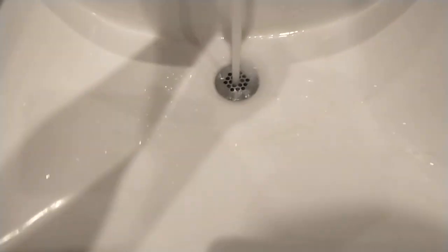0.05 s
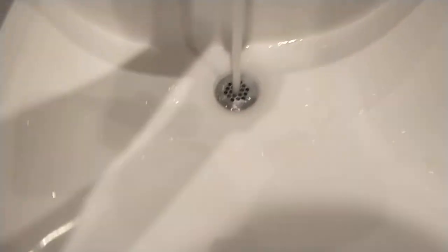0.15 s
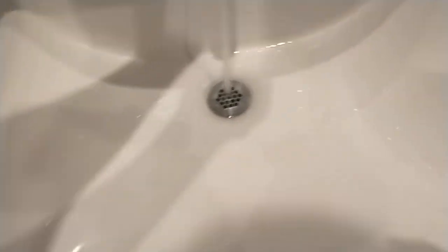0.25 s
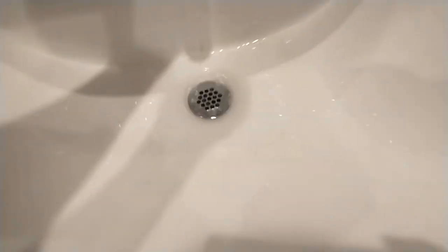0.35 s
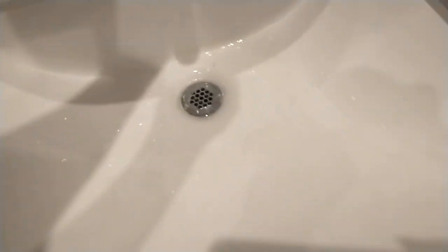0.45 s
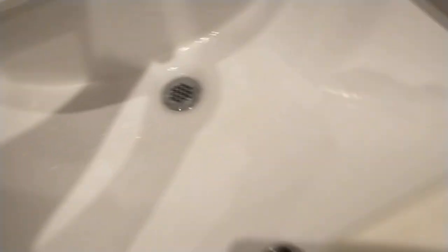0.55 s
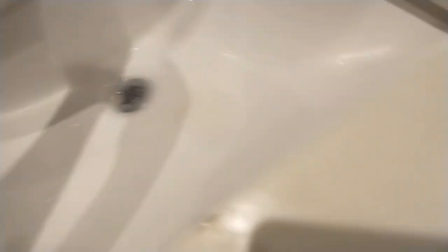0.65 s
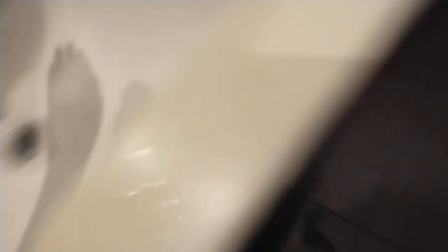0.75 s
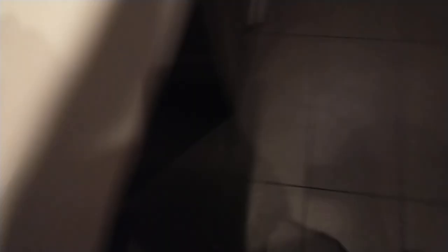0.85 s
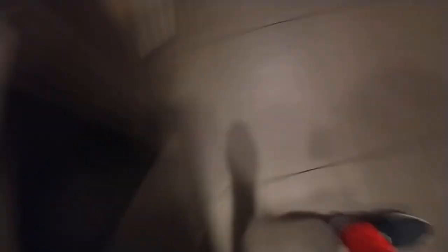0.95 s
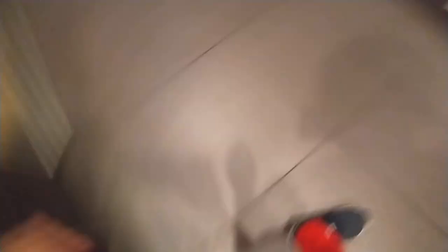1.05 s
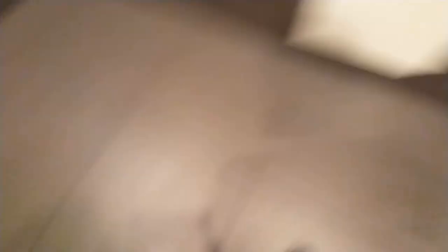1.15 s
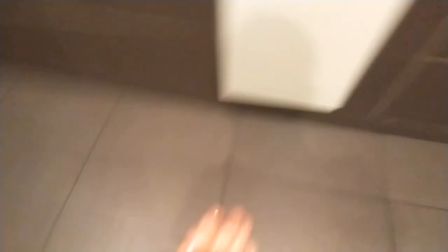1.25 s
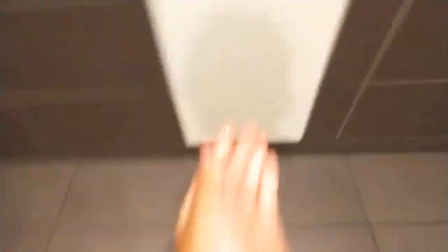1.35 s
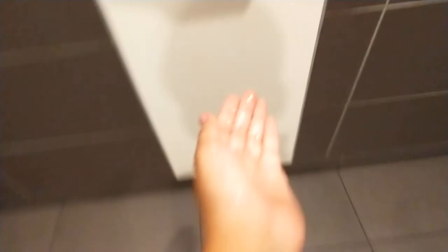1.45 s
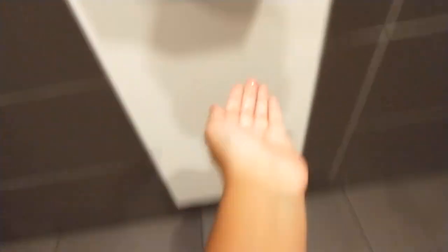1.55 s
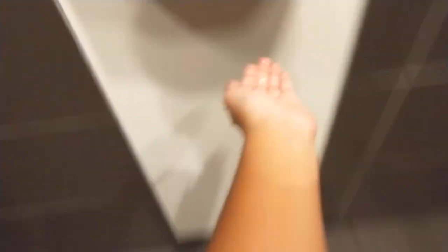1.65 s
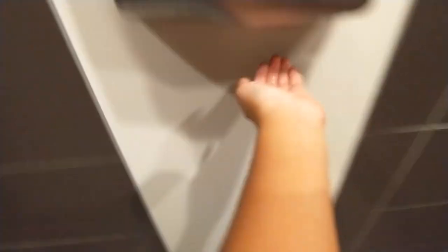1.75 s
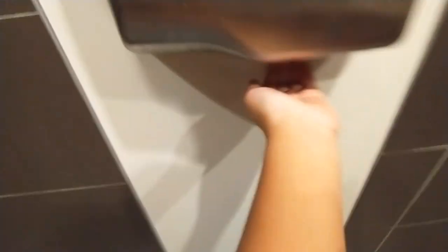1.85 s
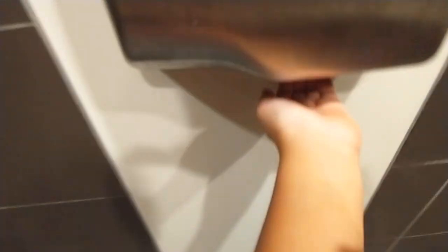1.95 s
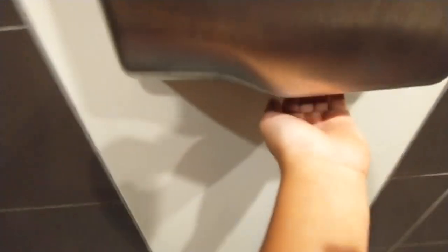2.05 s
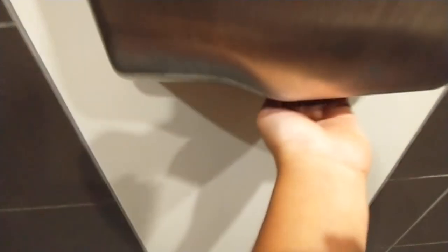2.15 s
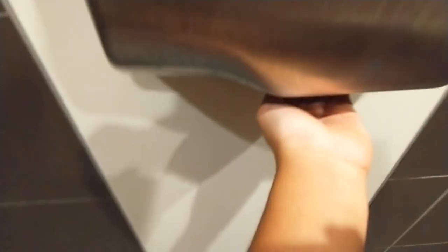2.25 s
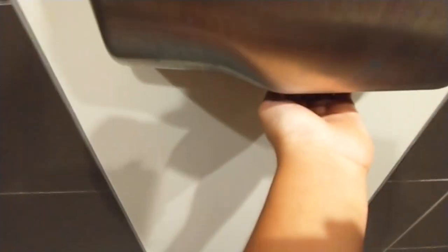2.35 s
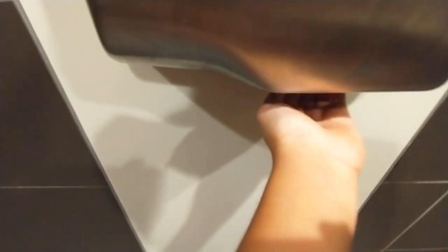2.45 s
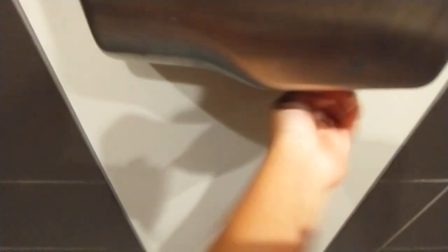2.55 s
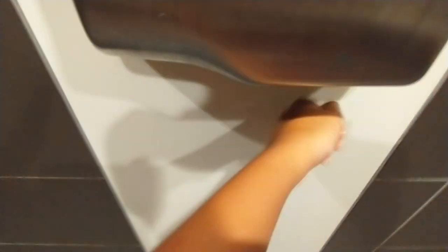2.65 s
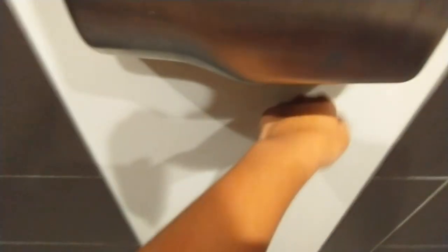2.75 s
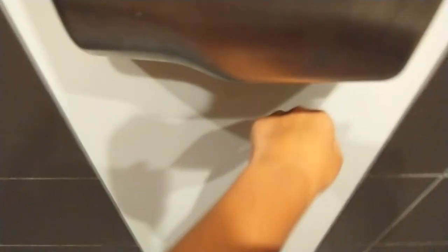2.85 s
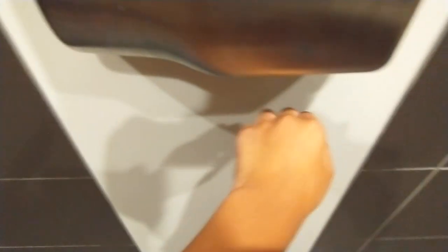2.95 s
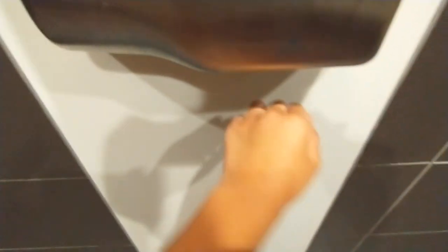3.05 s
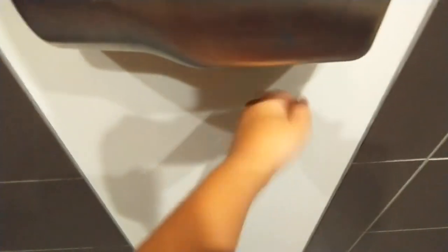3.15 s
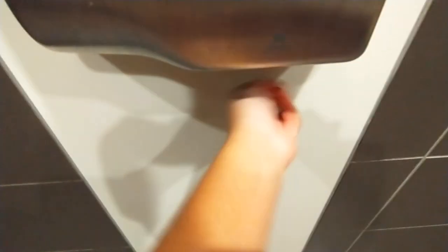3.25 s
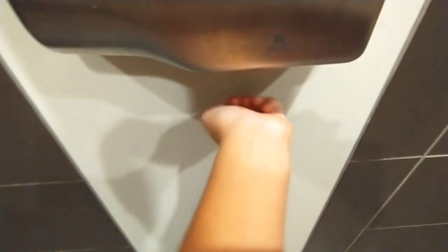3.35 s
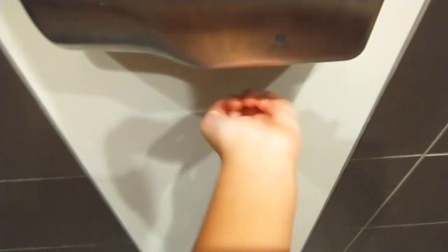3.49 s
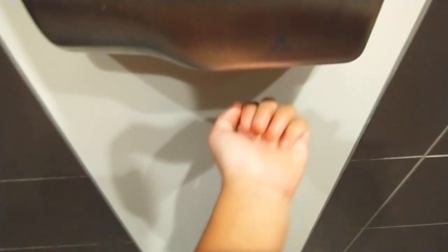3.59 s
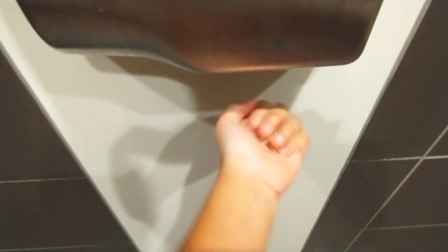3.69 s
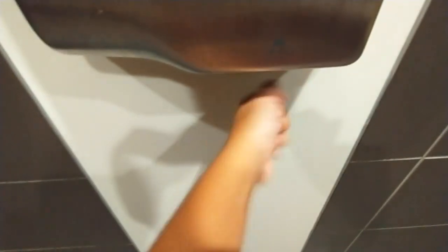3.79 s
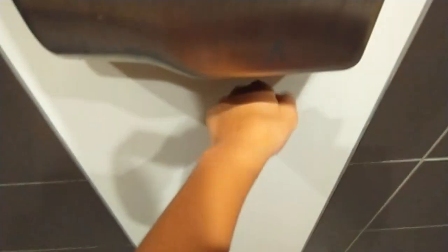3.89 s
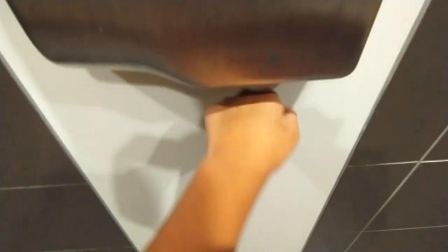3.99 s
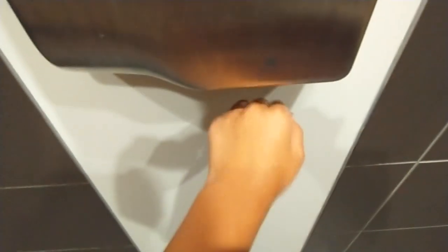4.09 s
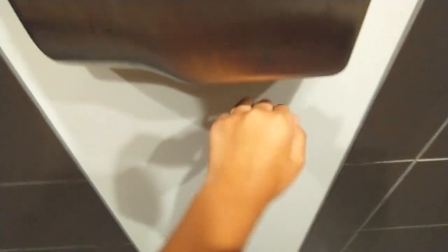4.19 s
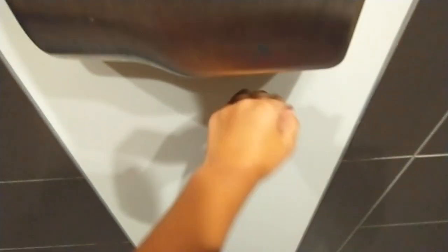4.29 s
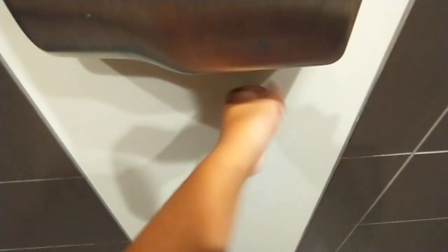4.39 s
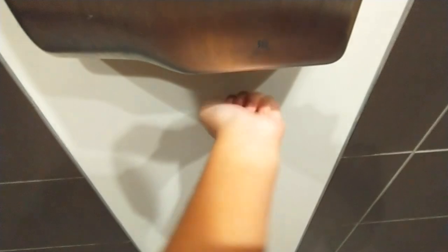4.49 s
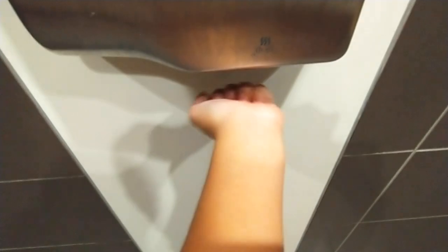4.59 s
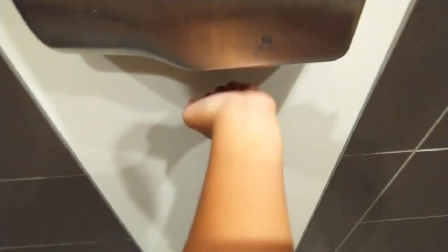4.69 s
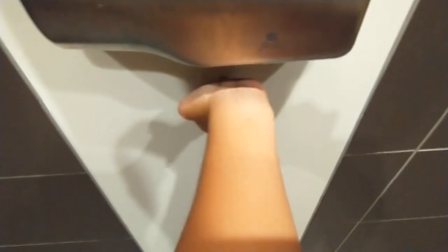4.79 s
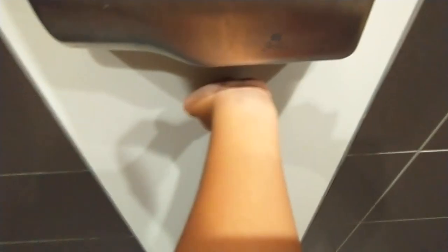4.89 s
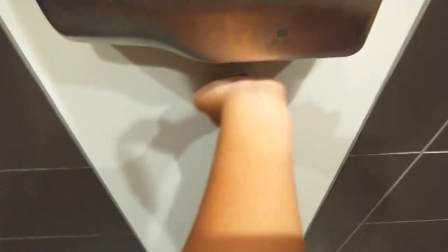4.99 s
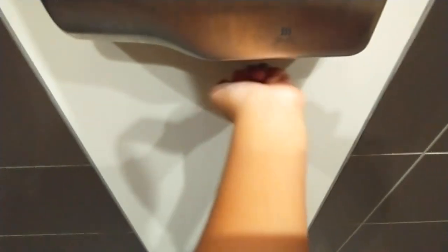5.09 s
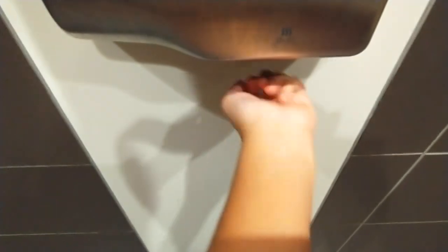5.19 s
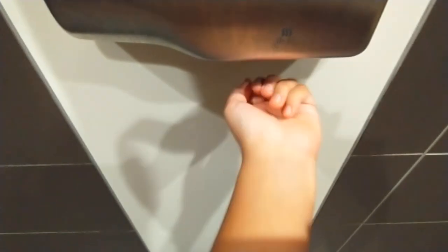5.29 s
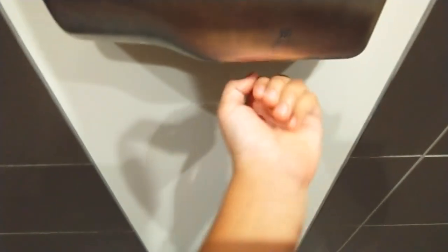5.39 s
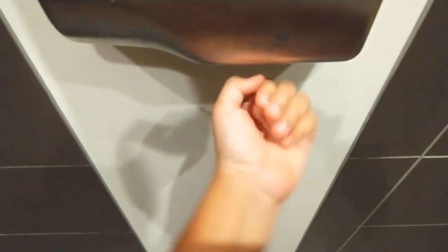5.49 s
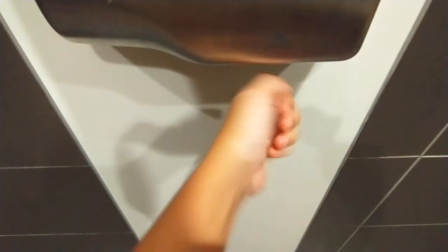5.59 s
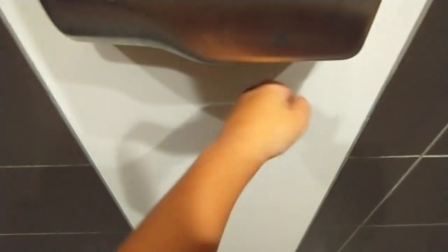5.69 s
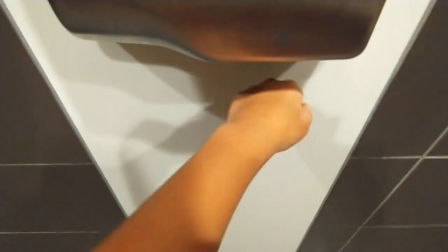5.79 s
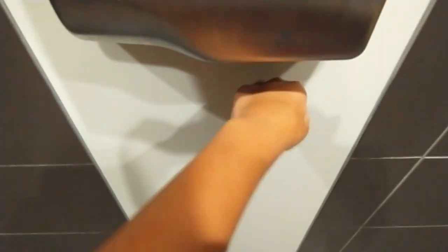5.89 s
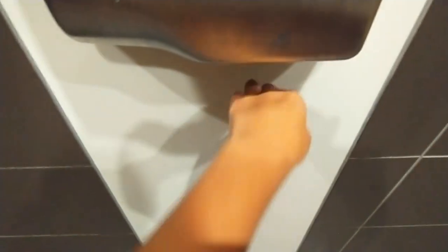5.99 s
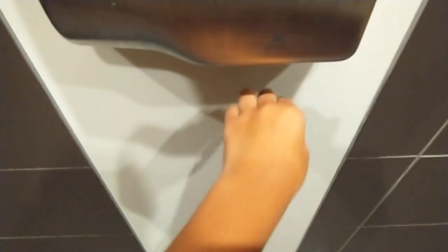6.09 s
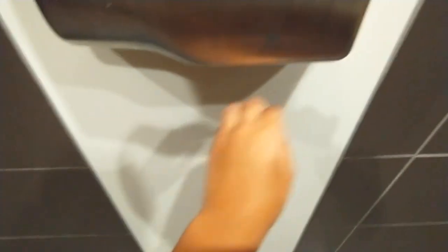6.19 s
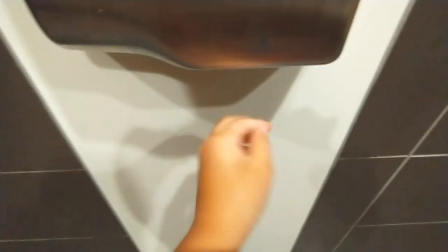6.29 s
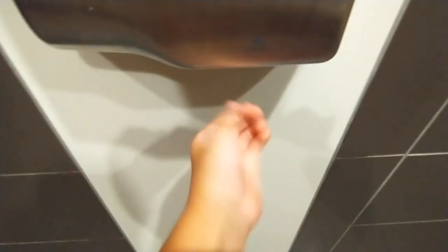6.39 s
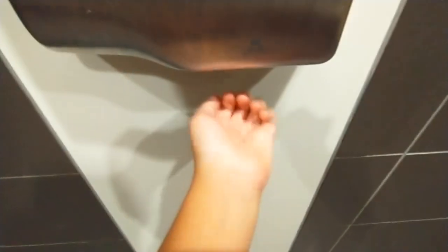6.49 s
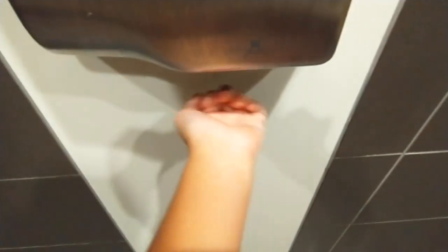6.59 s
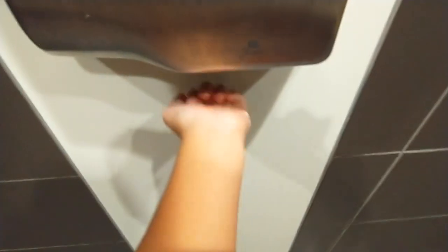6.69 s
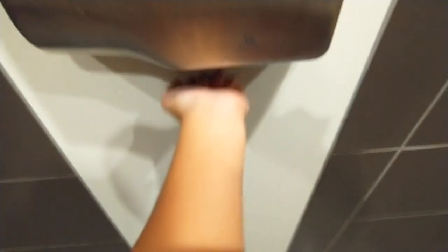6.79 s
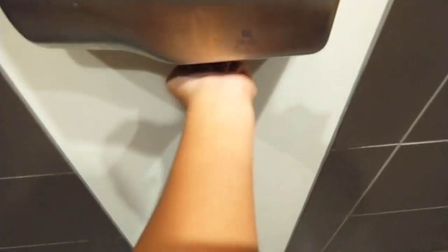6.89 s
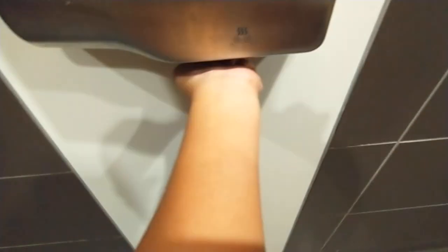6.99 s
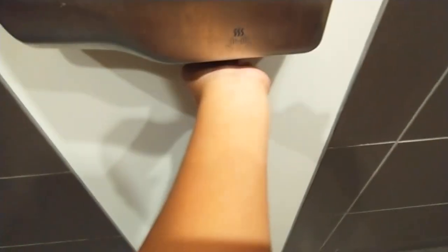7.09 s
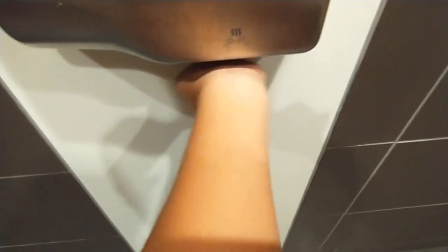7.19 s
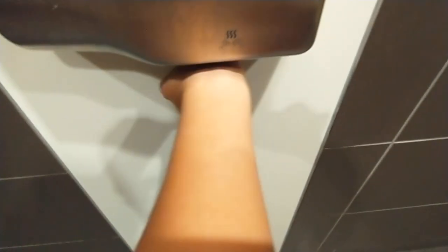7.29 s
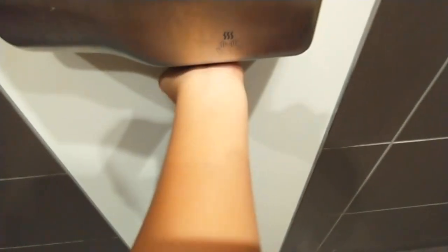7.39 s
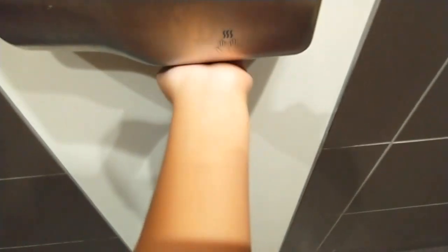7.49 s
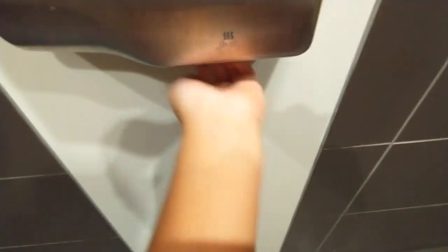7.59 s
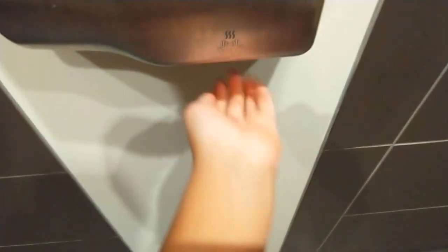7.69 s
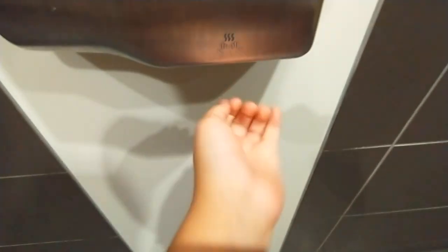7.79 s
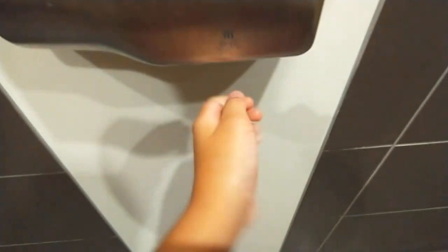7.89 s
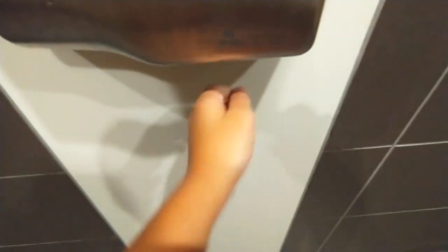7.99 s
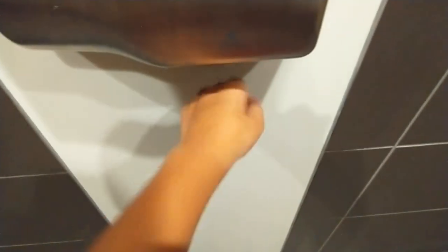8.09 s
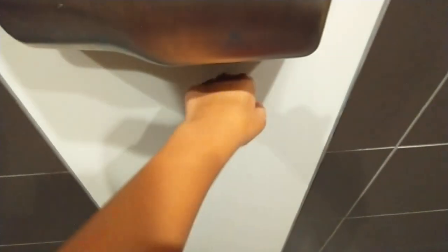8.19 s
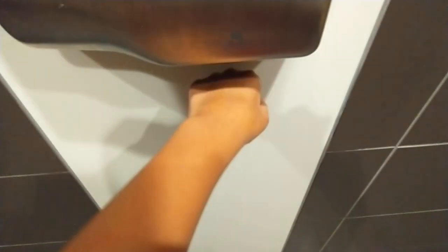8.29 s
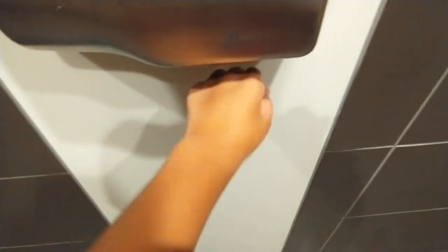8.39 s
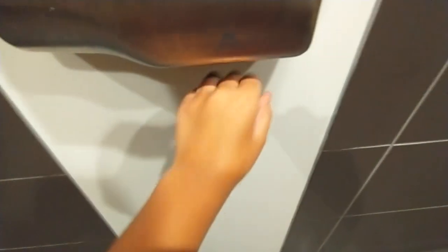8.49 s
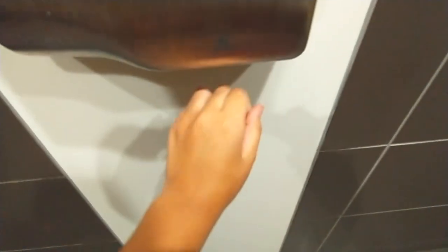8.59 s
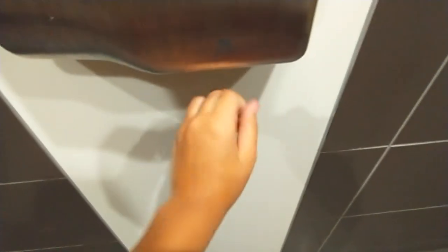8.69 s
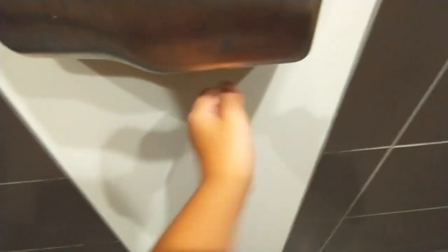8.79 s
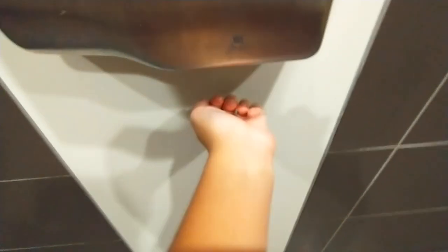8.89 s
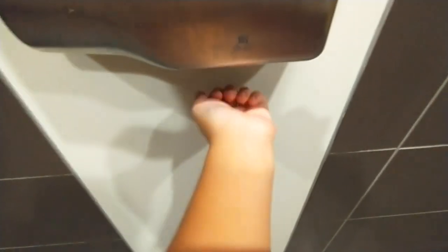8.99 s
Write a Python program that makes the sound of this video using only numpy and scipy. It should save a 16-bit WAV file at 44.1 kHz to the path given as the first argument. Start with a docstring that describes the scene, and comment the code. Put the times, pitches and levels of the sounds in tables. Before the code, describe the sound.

A thinning stream splashes in a sink, drops ticking and drain gurgling, until the valve knocks shut. About two seconds of near quiet hold only light clothing rustle and scuffs. Then a dryer clicks on, its motor tone climbing fast to a piercing whine under rushing hot-air noise. The roar continues to the end, fluttering as the hand turns, heard close on a handheld device in a small reverberant washroom.

```python
"""Water spatters into a basin and gurgles down the drain; the tap shuts with a knock, heard at once
as a crack and short rings. Soft scuffs and cloth swishes cross a still room with a thin tone.
A relay rattles; coils hum and the dryer's bar tone, phase-locked to the shaft, spins up.
Shaped noise makes the roar of air: it grows with speed, and a moving hand colours it
while stray gusts hit the two microphones of a hand-held camera. A sparse tail adds the room."""
import sys
import numpy as np
from scipy import signal
from scipy.io import wavfile
from scipy.ndimage import uniform_filter1d

SR = 44100
rng = np.random.default_rng(int(sys.argv[2]) if len(sys.argv) > 2 else 0)


def persist_wave(psi):
    """Save psi, clipped to +-1, as 16-bit WAV."""
    counts = np.round(np.clip(psi, -1, 1) * 32767).astype(np.int16)
    wavfile.write(sys.argv[1], SR, np.atleast_2d(counts).T)


N = 399105
T = np.arange(N) / SR
HZ = np.fft.rfftfreq(1024, 1 / SR)
FRAMES_S = np.arange(N // 256 + 5) * 256 / SR

# Jet at full speed, about usual: t/s, treble/dB, roar/dB, upper gap tone/dB, lower gap tone/dB
JET_MOTION = [(3.1, -3.5, -0.5, 3.5, 3.5), (3.3, -0.5, 0, 2.0, -3), (3.5, 0.0, 0, -1.5, 2.5),
              (3.8, 1, 1, 2, 6), (4.1, 1.0, 0.5, -4, -3.0), (4.25, -0.5, 0.5, -1.5, 6), (4.5, -1, 1, 0, 3),
              (4.75, 1.5, 0.5, -3, 4.5), (5.02, -1.5, 1.5, 3.5, -3), (5.2, -1.5, 0, -3, 8),
              (5.47, 0.0, 1.5, 1, 2.5), (5.8, 0.0, -0.5, 0, 1), (6, 2, 1.5, -0.5, -1),
              (6.18, 0.5, 1.0, -0.5, 9), (6.5, 0, 1.0, 1.5, -3), (6.7, -1, 0.5, 2, 3),
              (6.88, -2.5, 0, 1, -2.5), (7.02, 1.5, 0, 5.5, 2), (7.25, 0.5, -0.5, 4.5, -4),
              (7.45, -2.5, -1, 5, 7), (7.58, -2, 0.5, 0.5, 1), (7.72, 2, 0.5, 0.5, 0),
              (7.95, -0.5, -0.5, 2, 3.5), (8.4, 0.0, 1, 1.5, -2), (8.6, -1, 0, 1.5, 2), (8.8, 0, 0.5, 4, 2),
              (9.05, 0.5, 0.0, 0.0, 0.0)]
# Air spectrum: f/Hz, density/dB
AIR_SPECTRUM = [(29, -58), (50, -34), (188, -29), (257, 0), (327, -6.5), (396, -3), (447, -3), (569, -3.5),
                (920, -5.5), (1140, -7), (1530, -6.5), (1940, -5), (3630, -2.5), (5080, 0), (15800, -19.5)]
# Air balance: f/Hz, left minus right/dB
AIR_BALANCE = [(60, 5.0), (92, 28), (140, 18), (210, 6), (330, 1), (500, 5), (770, 6), (1170, 3.5),
               (1790, -0.5), (2740, 0), (4190, -7), (6410, 7), (9810, -1), (15000, -5.5)]
# Outlet resonances added to the air: f/Hz, width/Hz, level/dB
HOUSING_MODES = [(1147, 44, 9), (1302, 43, 7.5), (1442, 24, 5.5), (1966, 220, 2), (2600, 130, -10),
                 (2837, 240, 1.5)]
# Gap between hand and outlet sings: f/Hz, width/Hz
GAP_MODES = [(5070, 520), (4300, 450)]
# Low rings of housing and tiled room, fed by the roar: f/Hz, width/Hz, level/dB
BOOM_MODES = [(175, 10, -40), (223, 18, -32.5), (398, 20, -38.5), (507, 24, -39), (570, 16, -40),
              (635, 16, -40)]
GAP_DB = (2, -2)  # usual height over the air
# roar, hiss, fizz: dB per tenfold speed; lowest level; share of full speed where growth stops
GROWTH_DB, FLOOR_DB, GROWN_AT = (65, 90, 85), (-27, -34, -24), (.73, 0.83, 0.86)
HISS_FOLLOWS = 0.26  # treble's share of hiss motion; the rest follows the roar
SWING_DB, SWING_S = -7.5, (2.59, 2.83)  # jet starts on the right until the camera swings round
FLICKER_DB = 1.1  # rms

# Shortfall of the bar tone at switch-on: f/Hz, time constant/s
SPIN_UP = [(2476, .1284), (2912, .2766)]
# Hand chokes the outlet, unloaded rotor races: start/s, end/s, gain/Hz
CHOKES = [(7.2, 7.53, 24), (7.54, 7.62, 108)]
# Bar tone at each microphone as it climbs: f/Hz, left/dB, right/dB
WHINE_REACH = [(2200, -60, -52), (2560, -50, -29), (2950, -48, -35), (3400, -42, -20), (3650, -36, -25),
               (3950, -31, -14), (4300, -35, -22), (4800, -30, -13), (5200, -38, -29), (5450, -33, -19),
               (5750, -24, -17), (5900, -22, -22), (6040, -17, -22), (6150, -23, -30), (6270, -23.5, -34)]
# Bar tone fades and swells at the left microphone as its reflections interfere: t/s, level/dB
WHINE_FADING = [(3.5, 0), (3.65, -6), (3.77, 2), (3.9, -6), (4, 3), (4.11, -16), (4.23, 4), (4.5, -2),
                (4.7, 1), (4.95, -9), (5.3, 3), (5.45, -4), (5.72, 4), (6.1, -15), (6.28, 5), (6.45, -2),
                (6.6, 0), (6.72, -10), (6.84, 6), (6.96, -10), (7.4, 6), (7.52, 3), (7.6, -8), (7.92, -8),
                (8, 1), (8.2, -8), (8.28, 2), (8.4, -7), (8.62, 5), (8.85, -20), (9.05, 0)]
# Shell rung by the bar tone sweeping past: f/Hz, width/Hz, level/dB
SHELL_MODES = [(1930, 30, 6), (2560, 22, 9), (3390, 25, 3)]
# Once-per-turn rotor hum: t/s, left/dB, right/dB
SHAFT_LEVEL = [(2.55, -36, -36), (2.65, -27, -31), (2.85, -23, -29), (3.35, -26, -30), (3.75, -32, -33),
               (4.15, -29.5, -31.5), (5.5, -30.5, -32.5), (9.05, -29.5, -31.5)]
# Weaker shaft orders at full speed: multiple of shaft rate, left/dB, right/dB
SHAFT_ORDERS = [(4, -39, -46), (20, -39, -38), (28, -43, -49), (44, -57, -48), (48, -55, -54)]
# Coil hum, strong while the stalled coils pull hard: t/s, level/dB
COIL_HUM = [(2.405, -56), (2.44, -26), (2.48, -26), (2.51, -27), (2.56, -40.5), (9.05, -45.5)]
FULL_HZ, BARS = 6274, 24  # commutator bars passing the brushes per second; bars per turn
SETTLE_S, HUM_HZ = .33, 119.5
LEFT_WAVER_DB, RIGHT_WAVER_DB = 1.5, 3  # rms

# Relay closes: t/s, level/dB
RELAY = [(2.4048, -29)]
# Stray air from camera swing, then jet: t/s, length/s, level/dB, top f/Hz, side (0 left, 1 right)
GUSTS = [(0.5, .2, -52, 95, 1), (2.541, 0.16, -17.5, 203, 1), (2.548, 0.11, -29, 150, 0),
         (3.649, 0.064, -26, 170, 1), (3.749, 0.15, -30, 121, 0), (5.03, 0.051, -32, 120, 0),
         (5.354, .07, -43, 80, 1), (5.45, 0.056, -27, 119, 0), (6.67, 0.062, -26, 130, 0),
         (7.79, 0.1, -13.5, 266, 0), (7.863, 0.066, -21.5, 250, 1)]

# Closing tap: t/s, flow/dB, drain gurgle/dB
TAP_FLOW = [(0, -0.5, -34), (.2, -1.5, -31), (.33, -2.5, -34.5), (.42, -6.5, -38), (.46, -7.5, -52),
            (.53, -10.5, -47), (.64, -43, -65), (.74, -51, -81)]
# Spray spectrum: f/Hz, density/dB
SPRAY_SPECTRUM = [(1290, -34), (2200, -8), (2510, -15), (2750, -5), (3030, -4.5), (5310, 3), (5960, -1.5),
                  (8930, -3), (12500, -2.5), (15800, -9.5)]
# Spray balance: f/Hz, left minus right/dB
SPRAY_BALANCE = [(60, -11), (180, -2), (550, 0), (1650, -10), (4970, -1.5), (15000, -8)]
# Basin rung by the stream: f/Hz, width/Hz, level/dB
BASIN_MODES = [(740, 100, 10.5), (1060, 550, 4), (1800, 190, 2.5)]
# Single drops: t/s, level/dB, f/Hz
DROPS = [(0.0744, -9, 4430), (0.1474, -12, 10600), (0.2194, -5, 12600), (0.386, -3.5, 5750),
         (0.4314, -10, 4990), (0.4654, -22, 4970), (0.5094, -27, 6500)]
SPRAY_DB, BASIN_DB = -21.5, -37
BASIN_FOLLOWS = 0.57  # basin loses this share of the flow's fall in dB
TOP_DB, TOP_FOLLOWS, TOP_LEAST_DB = 2, 1.0, -20  # extra spray treble: offset, share of flow, floor
# two drain air pockets; pairs are before and after the stream thins
UPPER_HZ, LOWER_HZ, LOWER_DB = (325, 392), 255, (-11, 5)
SLOSH_DB, THINS_S = (-17.5, -5.5), (0.24, 0.332)

# Valve shuts: t/s, level/dB
KNOCK = [(0.49, -20.5)]
# Rings of the fitting: f/Hz, level/dB, t60/s
VALVE_MODES = [(500, -1, .035), (760, -5, .025), (1174, -2, .04), (1916, -1, .03)]

# Cloth spectrum: f/Hz, density/dB
CLOTH_SPECTRUM = [(470, -39), (800, -9), (1070, -14), (1180, -9), (3570, -3), (5190, -0.5), (9450, -15.5),
                  (11500, -12), (15800, -16)]
# Clothes: t/s, level/dB
SWISH = [(.62, -61), (1.02, -64), (1.15, -59), (1.17, -56.5), (1.3, -51.5), (1.54, -63.5), (1.7, -66),
         (1.85, -60.5), (2, -65.5), (2.25, -77), (2.37, -76)]
# Low soft scuffs, the first the last water draining, the rest perhaps shoes: t/s, peak level/dB
SCUFFS = [(.62, -49.5), (1.014, -66), (1.164, -59), (1.39, -78), (1.78, -58.5), (2.32, -70)]
SCUFF_RISE_DB_PER_S, SCUFF_FALL_DB_PER_S = 500, 103

# Empty room spectrum: f/Hz, relative density/dB
HUSH_SPECTRUM = [(15, -35.5), (25, -2), (130, 6), (189, -6.5), (268, -2), (513, -8.5), (1220, -24.5),
                 (3480, -31), (5220, -27), (6830, -36), (15800, -44)]
# Thin tone: t/s, level/dB
THIN_TONE = [(1.95, -90), (2.1, -79), (2.28, -76), (2.3, -100)]
HUSH_DB, THIN_HZ = -60.5, 1306

# Likeness of the two microphones: f/Hz, left-right share (1 = same)
LIKENESS = [(60, .4), (150, 0.48), (380, 1), (690, 0.48), (1050, 0.047), (1950, 1), (2600, 0.63),
            (4300, 0.12), (5300, 0.091)]
# Reverberation: f/Hz, t60/s
ROOM_DECAY = [(200, 0.48), (2000, 0.55), (10000, 0.39)]
LAG_S = 8e-5  # right microphone hears the shared part this much later
EDGE_HZ = 15870


def amp(db):
    """Amplitude factor of a level in dB."""
    return 10 ** (np.asarray(db) / 20)


def unit_rms(x):
    """Scale to rms 1."""
    return x / np.sqrt(np.mean(x ** 2) + 1e-20)


def read(points, hz=HZ):
    """Interpolate a spectrum over log frequency."""
    f, value = np.transpose(points)
    return np.interp(np.log(hz + 1), np.log(f + 1), value)


def curves(rows, t=T, off=-120):
    """Columns over the first one; off outside the table (None holds the ends)."""
    s, *columns = np.transpose(rows)
    return np.array([np.interp(t, s, c, off, off) for c in columns])


def bump(hz, width):
    """Power of a resonance over frequency, top 1."""
    return 1 / (1 + (2 * (HZ - hz) / width) ** 2)


def resonate(x, hz, width):
    """A fixed resonance of peak gain 1."""
    return signal.lfilter(*signal.iirpeak(hz, hz / width, SR), x)


def glide(x, hz, width):
    """A resonance on a pitch curve: shift down, smooth twice, shift back."""
    turn = np.exp(2j * np.pi * np.cumsum(hz) / SR)
    r = np.exp(-np.pi * width / SR)
    smooth = signal.lfilter([1], np.convolve([1, -r], [1, -r]), x / turn)
    return (turn * smooth).real


def wander(per_s):
    """Slow random drift of rms 1."""
    smooth = uniform_filter1d(rng.standard_normal(N), int(SR / per_s / 4))
    return unit_rms(signal.lfilter([1], [1, -np.exp(-2 * np.pi * per_s / SR)], smooth))


def pair(one, other, hz):
    """Left and right spectra that share a part, the right a little late."""
    same = np.clip(read(LIKENESS, hz), -1, 1)[:, None]
    late = np.exp(-2j * np.pi * hz * LAG_S)[:, None]
    return np.array([one, same * late * one + np.sqrt(1 - same ** 2) * other])


def noise(shape_db, lr_db, patchy_db):
    """Two-channel noise of a given spectrum, with patches drifting over time and frequency."""
    a, b, c, d, patches = rng.standard_normal((len(FRAMES_S), len(HZ), 5)).T
    patches = uniform_filter1d(patches, size=14, axis=0)
    patches = unit_rms(uniform_filter1d(patches, size=16, axis=1))
    level_db = shape_db + patchy_db * patches
    z = pair(a + 1j * b, c + 1j * d, HZ) * amp([level_db + lr_db / 2, level_db - lr_db / 2])
    return signal.istft(z, nperseg=1024, noverlap=768)[1][:, :N]


def blow(event, modes, rise_s=0.0017):
    """One hit ringing modes that die exponentially."""
    t = np.maximum(T - event[0], 0)
    rings = sum(amp(db - 60 * t / t60) * np.sin(2 * np.pi * hz * t) for hz, db, t60 in modes)
    return amp(event[1]) * (1 - np.exp(-t / rise_s)) * rings


def jet():
    """Turbulent air through housing resonances; roar, hiss and fizz grow with speed, follow the hand."""
    treble, roar, *gaps = curves(JET_MOTION, FRAMES_S, off=None)
    treble = treble + FLICKER_DB * np.interp(FRAMES_S, T, wander(6))
    motion = [roar, roar + HISS_FOLLOWS * (treble - roar), treble]
    speed = bar_rate(FRAMES_S) / FULL_HZ
    decades = np.log10(np.minimum(speed / np.c_[list(GROWN_AT)], 1))
    levels = [m + np.maximum(law * d, least)
              for m, law, d, least in zip(motion, GROWTH_DB, decades, FLOOR_DB)]
    rings = sum(amp(db) ** 2 * bump(hz, w) for hz, w, db in HOUSING_MODES)
    shape_db = read(AIR_SPECTRUM) + 10 * np.log10(1 + rings)
    # crossfade roar, hiss, fizz over frequency
    share = [np.interp(np.log(HZ + 1), np.log([2500, 4700, 8000]), row) for row in np.eye(3)]
    motion_db = sum(np.outer(s, level) for s, level in zip(share, levels))
    gap_db = sum(np.outer(bump(*mode) ** 2, usual + db)
                 for mode, usual, db in zip(GAP_MODES, GAP_DB, gaps))
    turn_db = np.interp(FRAMES_S, SWING_S, [SWING_DB, 0]) * np.clip(HZ / 900, .4, 1)[:, None]
    air = noise(shape_db[:, None] + motion_db + gap_db, read(AIR_BALANCE)[:, None] + turn_db, 1.12)
    air = amp(-13.0) * air / np.sqrt(np.mean(air[:, N // 2:] ** 2))
    push = rng.standard_normal(N) * amp(np.interp(T, FRAMES_S, levels[0]))
    booms = sum(amp(db) * unit_rms(resonate(push, hz, w)) for hz, w, db in BOOM_MODES)
    return (air + booms * amp([[2], [-2]])) * (T > RELAY[0][0])


def bar_rate(t):
    """Bar tone in Hz: climbs after switch-on, races while the outlet is choked, then settles."""
    on = np.maximum(t - RELAY[0][0], 0)
    hz = FULL_HZ - sum(short * np.exp(-on / tau) for short, tau in SPIN_UP)
    return hz + sum(gain * np.clip((t - a) / (b - a), 0, 1) * np.exp(-np.maximum(t - b, 0) / SETTLE_S)
                    for a, b, gain in CHOKES)


def motor():
    """Bar tone and shaft orders locked to one rotor phase, plus coil hum; returns whine, rest."""
    bar_hz = bar_rate(T)
    turns = np.cumsum(bar_hz * (1 + 0.00036 * wander(5.34))) / SR / BARS
    # brushes chatter more while the rotor strains for speed
    chatter_db = (1.2 + 9 * np.clip(1 - bar_hz / FULL_HZ, 0, .25)) * wander(70)
    reach_db = curves(WHINE_REACH, np.minimum(bar_hz, WHINE_REACH[-1][0]))
    left_db = curves(WHINE_FADING, off=0)[0] + LEFT_WAVER_DB * wander(8)
    fading_db = [left_db, RIGHT_WAVER_DB * wander(3.4)]
    whine = np.sqrt(2) * amp(reach_db + fading_db + chatter_db) * np.sin(2 * np.pi * BARS * turns)
    whine += sum(amp(db) * resonate(whine, hz, w) for hz, w, db in SHELL_MODES)
    shaft = amp(curves(SHAFT_LEVEL) + 2 * wander(30)) * np.sin(2 * np.pi * turns)
    speed_db = 60 * np.log10(bar_hz / FULL_HZ)
    for k, *level in SHAFT_ORDERS:  # each comes and goes
        shaft += amp(np.c_[level] + speed_db + 4 * wander(1.5)) * np.sin(2 * np.pi * k * turns)
    buzz = sum(np.sin(2 * np.pi * k * HUM_HZ * T) / k ** 1.6 for k in range(1, 7))
    hum = amp(curves(COIL_HUM)[0]) * buzz * amp(3.4 * wander(4.1))
    return whine, np.sqrt(2) * shaft * (T > RELAY[0][0]) + hum


def relay():
    """Contacts close and bounce: a short bright rattle of noise with a fast and a slow decay."""
    t = T - RELAY[0][0]
    rattle = (t > 0) * (amp(-60 * abs(t) / 0.011) + 0.34 * amp(-60 * abs(t) / .09))
    bright = resonate(rng.standard_normal((2, N)), 5700, 9000)
    return amp(RELAY[0][1]) * rattle * bright * amp([[-3], [3]])


def gusts():
    """Lumpy low pressure, unrelated at the two microphones."""
    out = np.zeros((2, N))
    for s, length, db, hz, side in GUSTS:
        push = rng.standard_normal(SR // 4)
        band = signal.butter(2, [70, hz], "band", fs=SR, output="sos")
        low = signal.sosfilt(band, push)[-round(length * SR):]
        at = round(s * SR)
        out[round(side), at:at + len(low)] += amp(db) * unit_rms(low) * signal.windows.tukey(len(low), .4)
    return out


def tap():
    """Spray noise in random spatters, single ringing drops and a basin rung by the stream."""
    flow_db = curves(TAP_FLOW)[0]
    top_db = np.maximum(TOP_DB + TOP_FOLLOWS * curves(TAP_FLOW, FRAMES_S)[0], TOP_LEAST_DB)
    hits = rng.random((2, N)) < 400 / SR  # 400 per second
    splats = amp(4 * np.minimum(rng.exponential(1, (2, N)), 3)) * hits
    spatter = 1 + 0.36 * signal.lfilter([1], [1, -np.exp(-1 / (0.0028 * SR))], splats)
    # treble dies first as the flow thins
    treble_share = np.clip((HZ - 6000) / 3000, 0, 1)
    shape_db = read(SPRAY_SPECTRUM)[:, None] + np.outer(treble_share, top_db)
    spray = noise(shape_db, read(SPRAY_BALANCE)[:, None], 0.55) * spatter
    spray *= amp(SPRAY_DB + flow_db) / np.std(spray[:, :SR // 3])
    drops = sum(blow((s, db), [(hz, -3, .004)], rise_s=.0002) for s, db, hz in DROPS)
    stream = rng.standard_normal((2, N))
    basin = unit_rms(sum(amp(db) * resonate(stream, hz, w) for hz, w, db in BASIN_MODES))
    return spray + drops * amp([[-4], [4]]) + basin * amp(BASIN_DB + BASIN_FOLLOWS * flow_db)


def drain():
    """Falling water shakes two air pockets over a low slosh; the upper pitch rises as it thins."""
    water = rng.standard_normal((3, N)) * amp(2 * wander(40))
    upper = unit_rms(glide(water[0], np.interp(T, THINS_S, UPPER_HZ), 62))
    lower = unit_rms(glide(water[1], np.full(N, LOWER_HZ), 60)) * amp(np.interp(T, THINS_S, LOWER_DB))
    slosh = unit_rms(resonate(resonate(water[2], 85, 90), 85, 170))
    slosh = slosh * amp(np.interp(T, THINS_S, SLOSH_DB))
    return (upper + lower + slosh) * amp(curves(TAP_FLOW)[1])


def knock():
    """The valve seats: a dull noise crack and short rings of the fitting."""
    t = T - KNOCK[0][0]
    crack = unit_rms(resonate(rng.standard_normal(N), 1100, 1500)) * (t > 0) * amp(-60 * abs(t) / 0.043)
    return blow(KNOCK[0], VALVE_MODES) + amp(KNOCK[0][1] - 9) * crack


def swishes_and_scuffs():
    """Enveloped noise: cloth swishes, and low scuffs of the last water and then perhaps shoes."""
    swish = unit_rms(noise(read(CLOTH_SPECTRUM)[:, None], -4.5, 2.3)) * amp(curves(SWISH)[0])
    scuffs = sum(amp(db + np.minimum(SCUFF_RISE_DB_PER_S * (T - s), SCUFF_FALL_DB_PER_S * (s - T)))
                 for s, db in SCUFFS)
    return swish + unit_rms(resonate(rng.standard_normal(N), 340, 400)) * scuffs


def hush():
    """The still room as shaped noise, with one thin sine tone."""
    tone = amp(curves(THIN_TONE)[0]) * np.sin(2 * np.pi * THIN_HZ * T)
    return amp(HUSH_DB) * unit_rms(noise(read(HUSH_SPECTRUM)[:, None], -2.5, 0.76)) + tone


def room(x):
    """Reverberation: sparse taps of random sign, each band dying at its own speed."""
    taps = np.zeros((2, SR))
    at = np.arange(300, SR - 20, 20) + rng.integers(0, 20, (2, (SR - 301) // 20))
    np.put_along_axis(taps, at, rng.choice([-1., 1.], at.shape), 1)
    hz, t, z = signal.stft(taps, SR, nperseg=256)
    decay = amp(-60 * t / read(ROOM_DECAY, hz)[:, None])
    tail = signal.istft(pair(*z, hz) * decay, SR, nperseg=256)[1]
    return signal.fftconvolve(x, tail / np.linalg.norm(tail[0]), axes=1)[:, :N]


def scene():
    """Sum the direct sources, their room tail and the dry background."""
    whine, hum = motor()
    near = relay() + knock() + tap() + drain() + jet()
    wet = room(amp(-9) * whine + amp(-18) * hum + amp(-8) * near)
    return whine + hum + near + wet + swishes_and_scuffs() + hush() + gusts()


def record(dry):
    """Small microphones lose deep bass; the highest peaks are flattened; then the band limit."""
    thin = signal.sosfilt(signal.butter(2, 55, "high", fs=SR, output="sos"), dry)
    flat = np.clip(thin, -1, 1)
    lowpass = signal.firwin(1023, EDGE_HZ, window=("kaiser", 9), fs=SR)
    return signal.oaconvolve(flat, lowpass[None], "same")


dry = scene()
out = record(dry)
persist_wave(out)
```